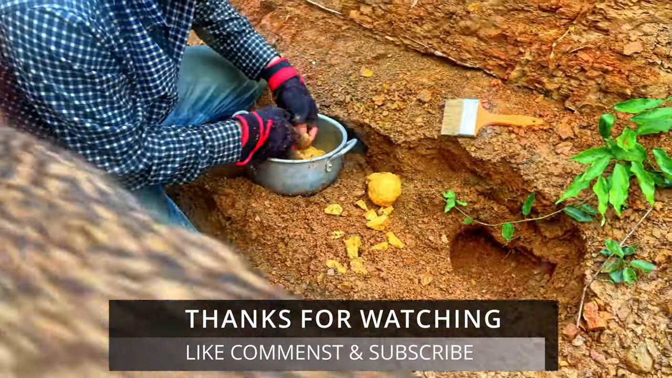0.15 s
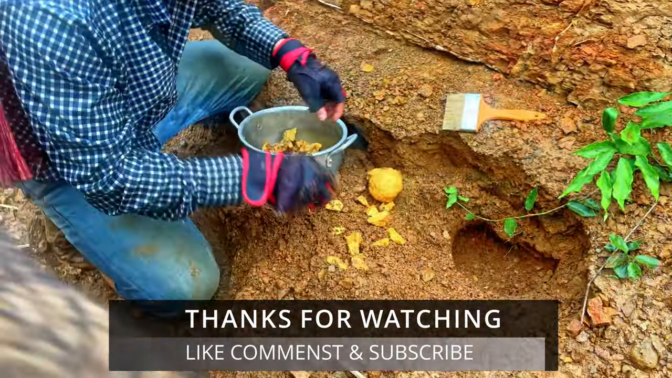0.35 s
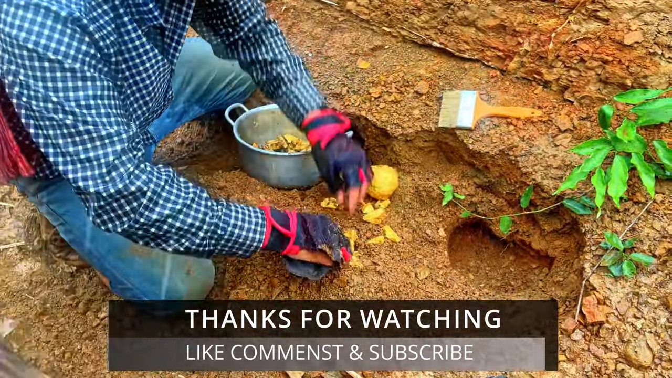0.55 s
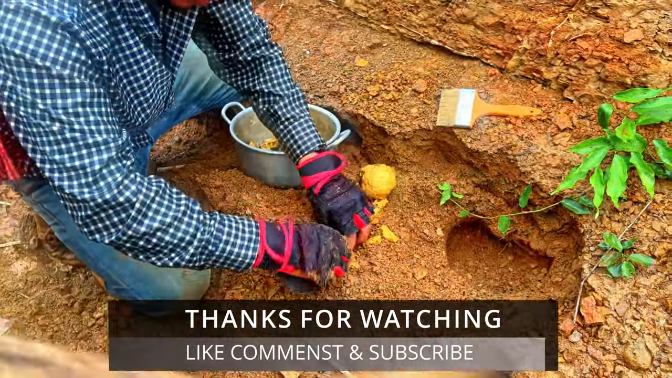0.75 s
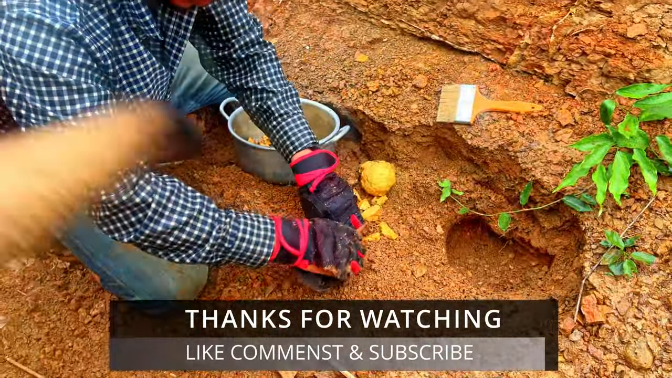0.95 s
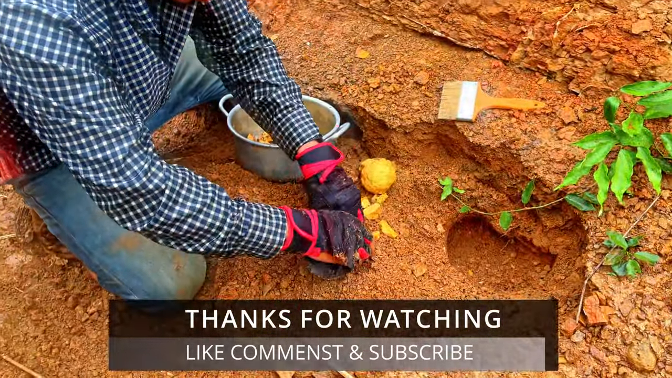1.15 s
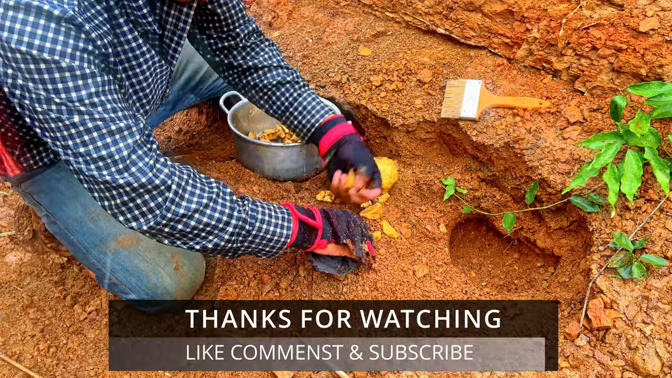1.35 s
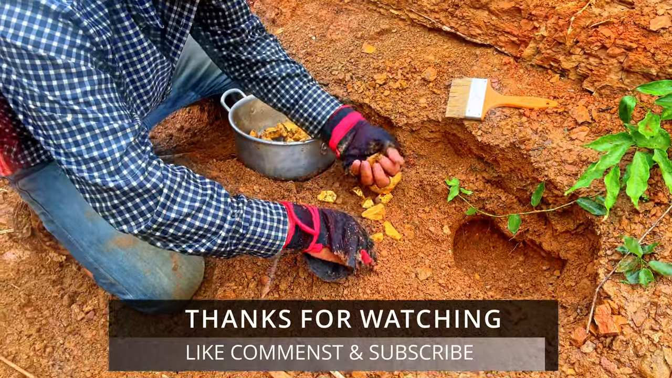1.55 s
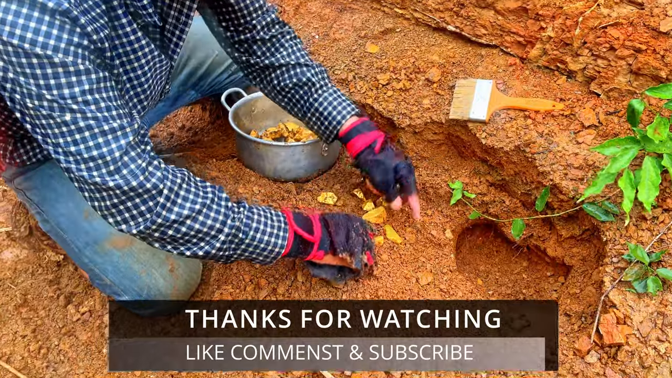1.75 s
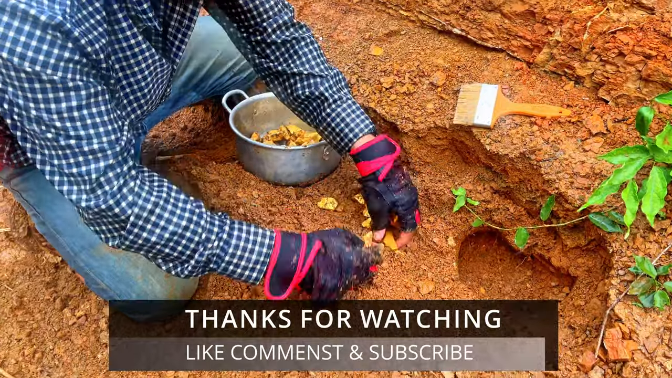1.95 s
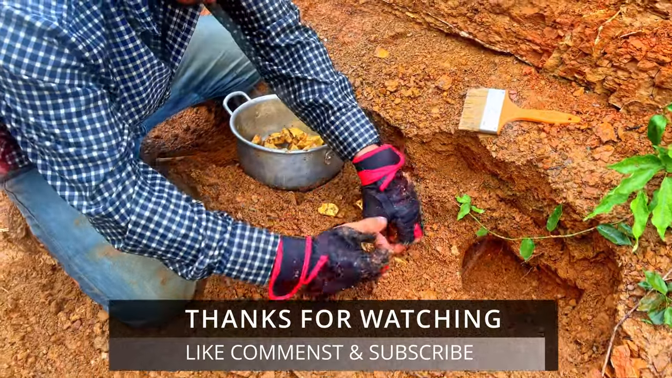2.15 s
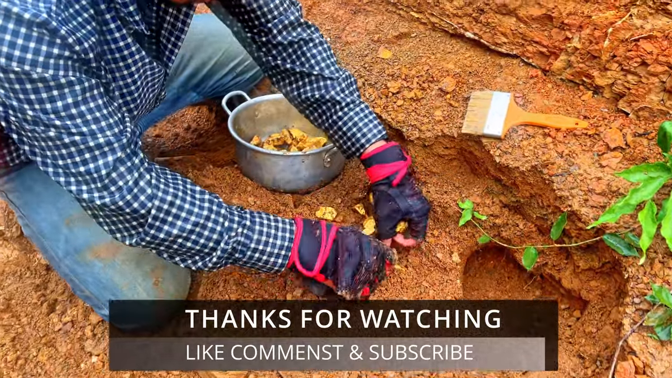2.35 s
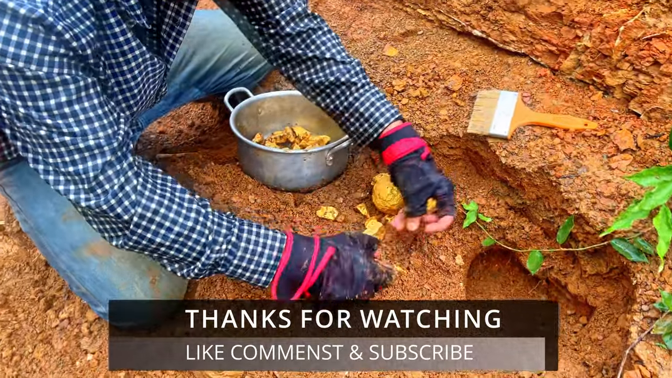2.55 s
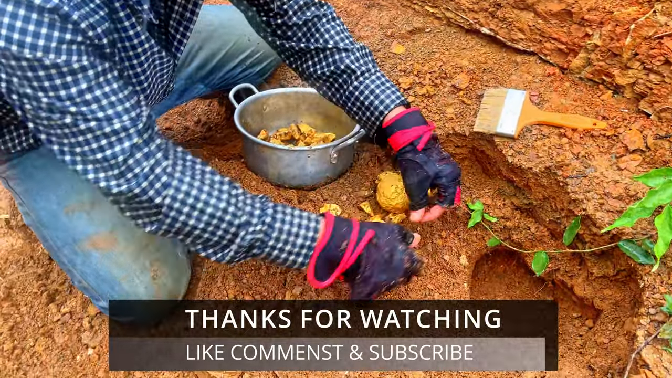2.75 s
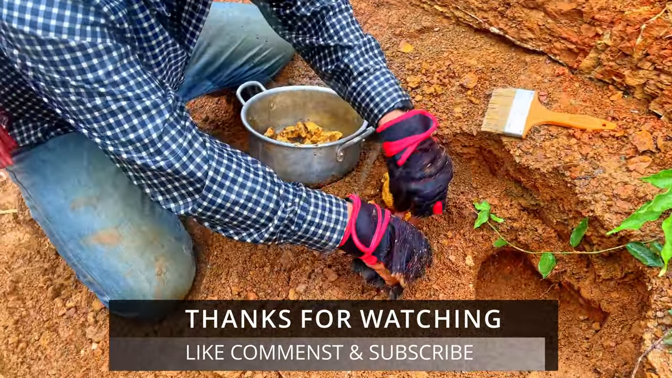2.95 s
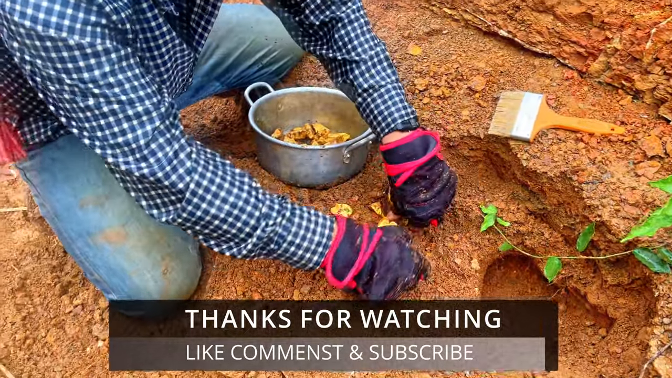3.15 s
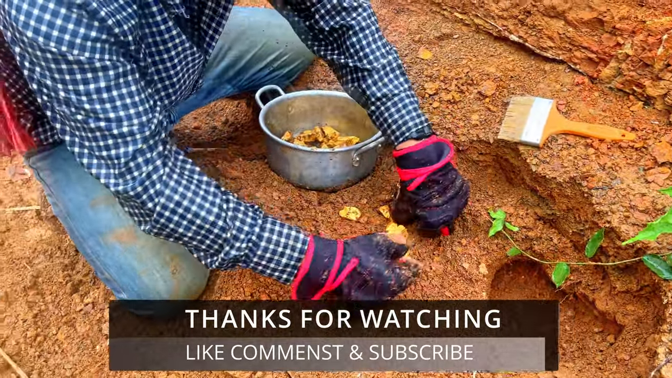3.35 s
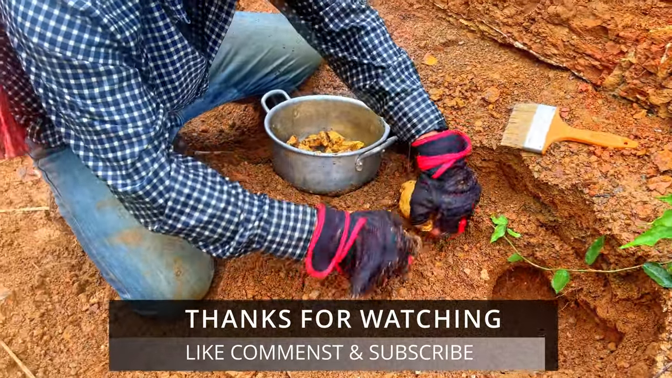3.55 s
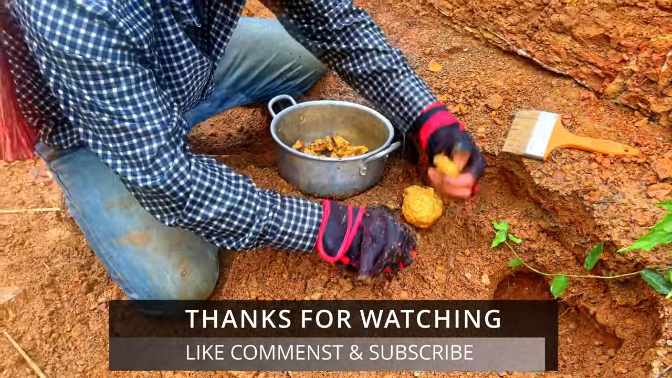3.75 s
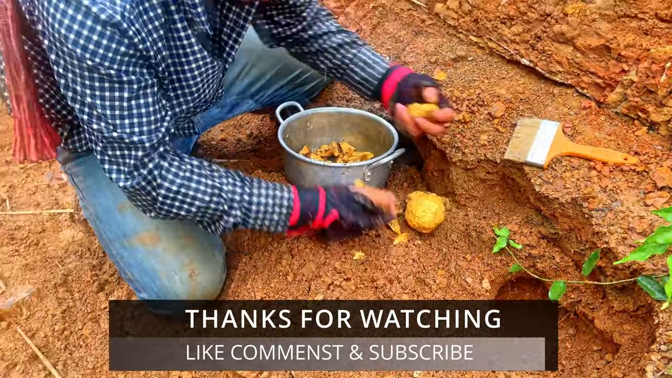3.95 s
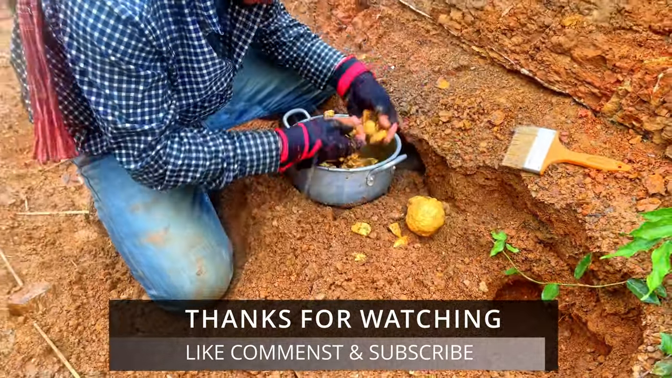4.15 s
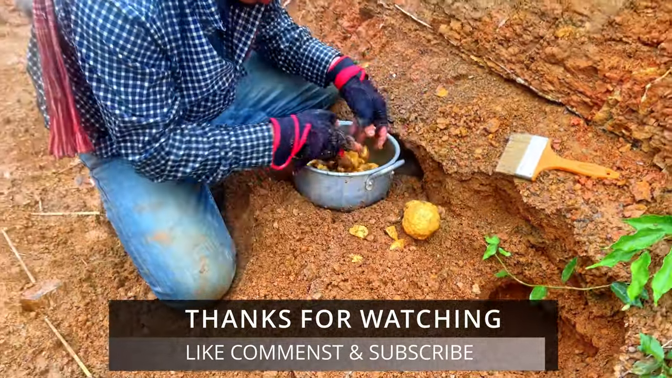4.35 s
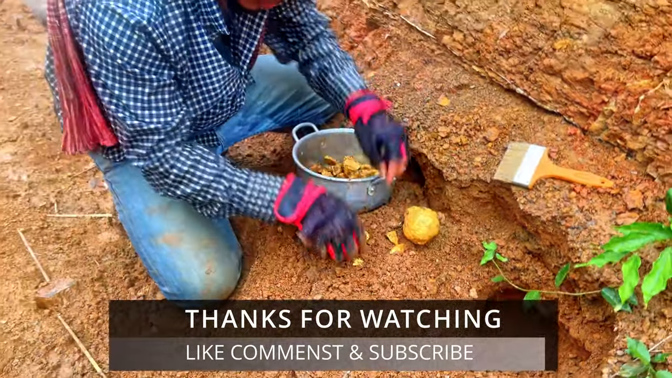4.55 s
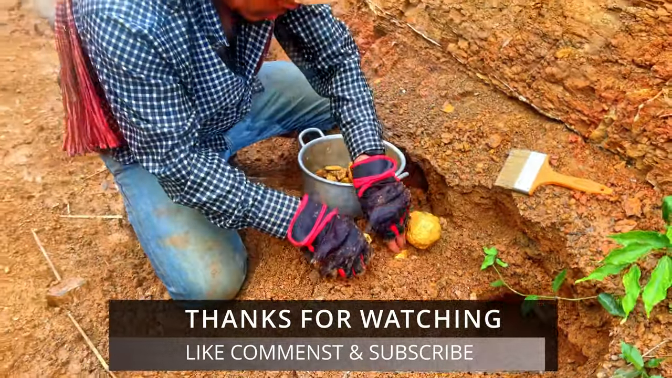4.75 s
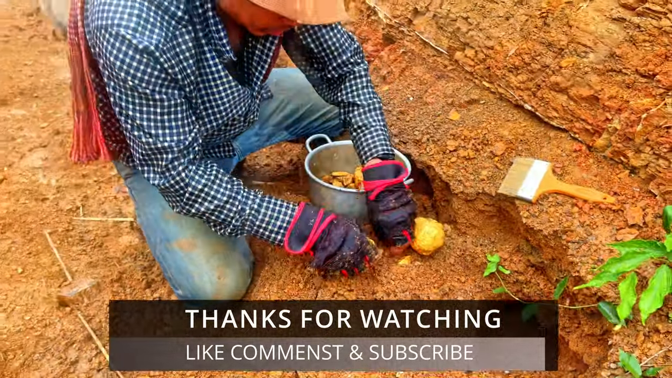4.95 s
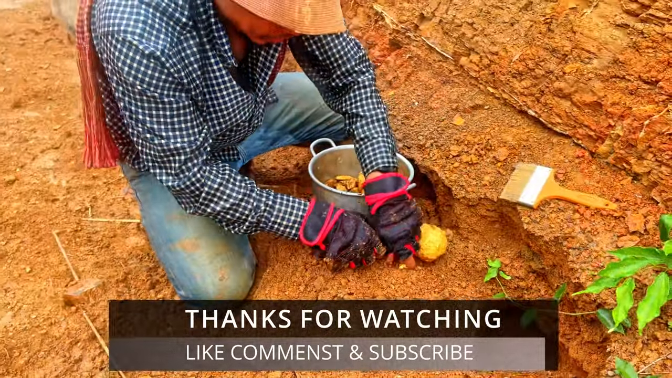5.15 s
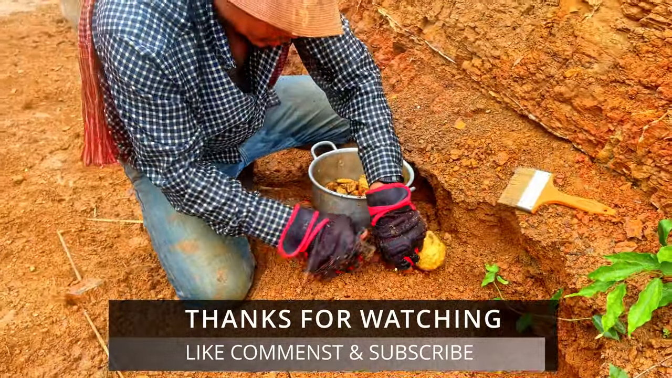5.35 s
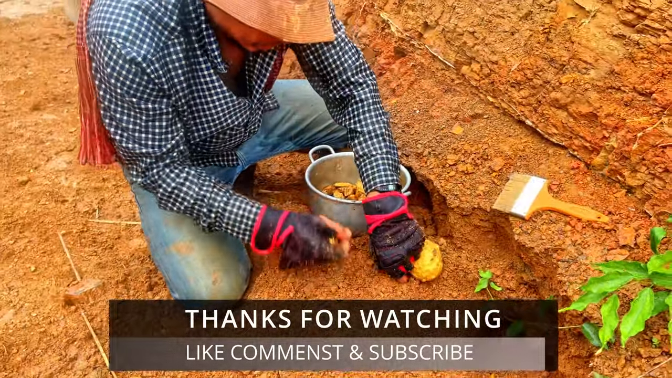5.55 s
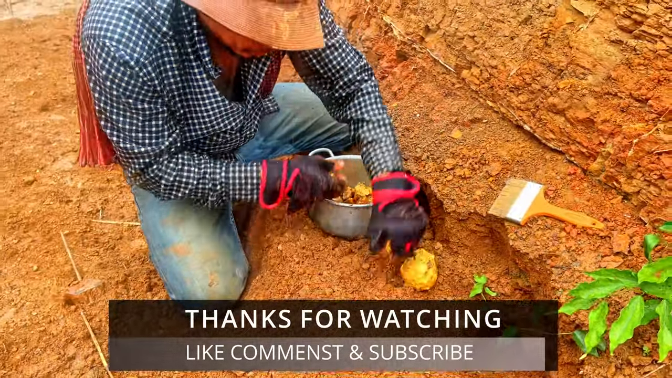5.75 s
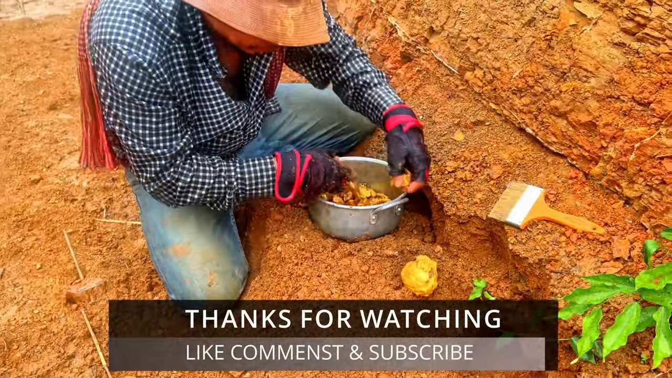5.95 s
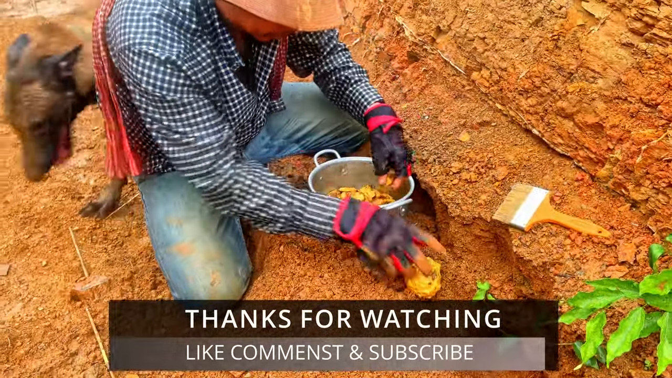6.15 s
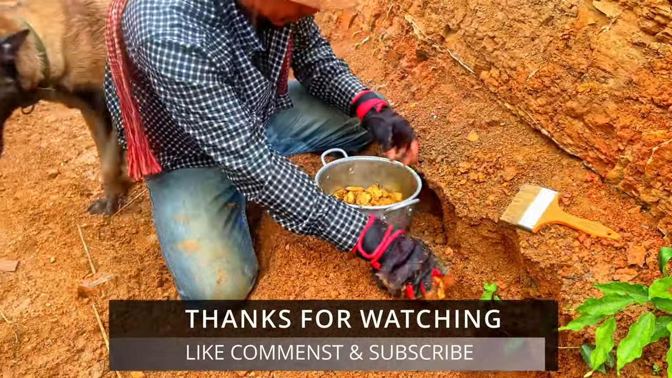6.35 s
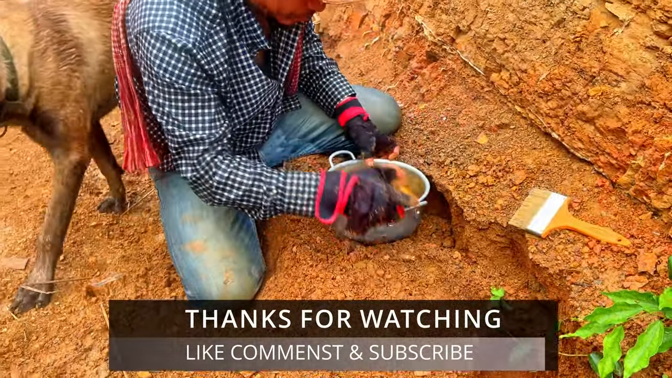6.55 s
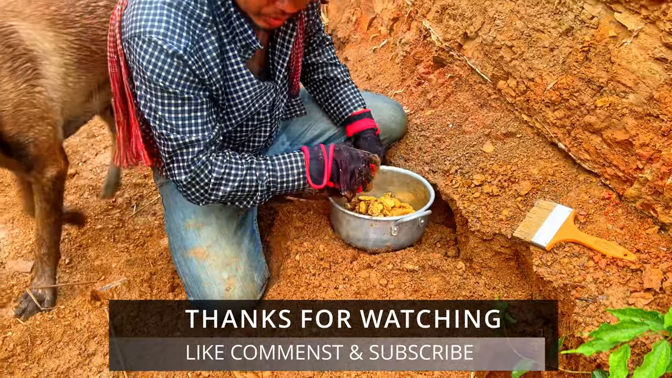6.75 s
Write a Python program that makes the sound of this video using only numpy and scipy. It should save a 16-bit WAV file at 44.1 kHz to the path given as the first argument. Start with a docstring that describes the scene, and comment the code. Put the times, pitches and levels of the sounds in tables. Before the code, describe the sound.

Dry grit crackles and crunches under fingers, with small knocks and brief tinny clatters as lumps land in a metal pot outdoors.

```python
"""Soil lumps into a metal pot

Gloved hands gather lumps from loose dry soil and drop them into a thin metal pot, a metre from a phone.
Grit crackles under the fingers, lumps knock together and crack, the pot rings briefly, a palm scrapes.
A bright, steady open-country hiss lies over a low rustle whose bass comes and goes,
and the mids go hollow in places."""
import sys
import numpy as np
from scipy import signal
from scipy.fft import rfft, irfft
from scipy.io import wavfile
from scipy.ndimage import uniform_filter1d

SR = 44100
rng = np.random.default_rng(int(sys.argv[2]) if len(sys.argv) > 2 else 0)


def to_wav(sig):
    """Store sig (one row per channel, or 1-D mono) as 16-bit WAV at the path in sys.argv[1].

    Samples outside -1..1 are clipped; the rate is SR.
    """
    pcm = np.clip(np.atleast_2d(sig), -1, 1) * 32767
    pcm = np.round(pcm).astype(np.int16)
    wavfile.write(sys.argv[1], SR, pcm.T)  # frames by channels


N = 299880
FRAME, OVERLAP = 2048, 1536  # samples


def undb(db):
    return 10 ** (np.asarray(db) / 20)


def along(table, hz):
    """Read a (Hz, value) table on a log-frequency axis."""
    f, v = np.transpose(table)
    return np.interp(np.log(hz + 1), np.log(f + 1), v)


def curve(table, s):
    """Read the columns of a (seconds, value, ..) table at the times s."""
    t, *columns = np.transpose(table)
    return np.array([np.interp(s, t, c) for c in columns])


def eq(x, table):
    """Pass x through a (Hz, dB) curve."""
    gain = undb(along(table, np.fft.rfftfreq(N, 1 / SR)))
    return irfft(rfft(x.astype(np.float32)) * gain, N)


def add(out, s, x):
    """Mix a short sound in at s seconds."""
    i = max(int(s * SR), 0)
    out[..., i:i + x.shape[-1]] += x[..., :N - i]


def frames_of(x):
    """Short-time spectra: Hz, seconds, frames."""
    return signal.stft(x, SR, nperseg=FRAME, noverlap=OVERLAP)


def snap(decay_ms, width=1.0):
    """A brittle break: a ragged stereo noise burst that dies almost at once."""
    ms = np.arange(SR // 30) * 1000 / SR
    noise = rng.standard_normal(len(ms)) + width * rng.standard_normal((2, len(ms)))
    ragged = np.repeat(undb(3.5 * rng.standard_normal(len(ms))), SR // 1500)[:len(ms)]
    fade = (1 - np.exp(-ms / 0.61)) * np.exp(-ms / decay_ms)
    burst = noise * ragged * fade
    return 1.89 * burst * np.sqrt(2 * np.sum(fade ** 2) / np.sum(burst ** 2))


# Tone of the open air. Each row: frequency in Hz, relative level in dB.
HISS_EQ = [(710, -44.5), (1200, -6.5), (1750, -5), (2150, -2), (2910, -4.5), (4440, -5.5), (6920, -10.5),
           (8870, 1.5), (10200, 5), (11100, 2.5), (11900, -6.5), (12900, -7), (13800, -49), (14700, -16),
           (15900, -26)]
# Rustle automation. Each row: time in seconds, bass edge in Hz, low gain in dB, mid gain in dB.
RUSTLE_MOVES = [(0, 50, -27, -27.5), (.35, 55.5, -20.5, -16), (.6, 49.7, -26, -25.5), (1.4, 70, -27, -36.5),
                (1.57, 129, -29, -47), (1.65, 118, -17, -40), (1.85, 202, -21, -39), (2.3, 154, -35.5, -44),
                (2.52, 79.5, -28, -34.5), (2.58, 90, -25.5, -42), (2.75, 110, -28.5, -50),
                (2.9, 199, -25.5, -41), (3.25, 205, -28.5, -40.5), (3.33, 149, -24, -28.5),
                (3.5, 190, -25.5, -34), (4.0, 148, -32.5, -38.5), (4.3, 109, -25, -45),
                (4.4, 300, -59, -30), (5.5, 269, -48, -47.5), (6.03, 225, -32.5, -59),
                (6.12, 104, -34, -59), (6.22, 174, -33, -38.5), (6.62, 183, -37, -59),
                (6.72, 278, -46, -49)]
# The rustle's low, scoop and mid EQ points in Hz.
RUSTLE_POINTS_HZ = [407, 460, 950]
# How centred the bed sits. Each row: frequency in Hz, left-right correlation from 0 to 1.
BED_CORRELATION = [(100, 0.3), (400, 0.65), (1000, 0.07), (2000, 0.28), (4000, 0.5), (8000, 0.98),
                   (12000, 0.98)]


def rustle_and_hiss(hiss_db=-40, split_hz=1400, rustle_flicker_db=5.0, hiss_flicker_db=4.0, swell_db=1.0):
    """The noise bed, as short-time spectra: soil and sleeves rustle below, open air hisses on top."""
    hz, s, (left, independent) = frames_of(rng.standard_normal((2, N)))
    hiss = along(HISS_EQ, hz)
    hiss += hiss_db - 10 * np.log10(np.mean(undb(2 * hiss)))
    db = np.empty(left.shape)
    for k, (edge, low, mid) in enumerate(curve(RUSTLE_MOVES, s).T):
        bass = [(edge / 2, low - 43), (edge, low - 20), (min(1.54 * edge, 330), low - 3)]
        scoop = (low + mid) / 2 - 4
        body = zip(RUSTLE_POINTS_HZ, (low, scoop, mid))
        db[:, k] = along([*bass, *body, (split_hz, np.interp(split_hz, hz, hiss))], hz)
    below = hz[:, None] < split_hz
    db = np.where(below, db, hiss[:, None])
    flicker = uniform_filter1d(rng.standard_normal(db.shape), size=6, axis=0)
    flicker = uniform_filter1d(flicker, size=3, axis=1)
    flicker = np.minimum(flicker / flicker.std(), 1)  # dips freely, never bulges into a thump
    swell = uniform_filter1d(rng.standard_normal(len(s)), size=3)
    db += np.where(below, rustle_flicker_db, hiss_flicker_db) * flicker + swell_db * swell / swell.std()
    alike = np.clip(along(BED_CORRELATION, hz), 0, 1)[:, None]
    right = alike * left + np.sqrt(1 - alike ** 2) * independent
    return undb(db) * np.array([left, right])


# The bright crack of dry soil. Each row: frequency in Hz, gain in dB.
CRACK_EQ = [(400, -43.5), (1000, -12.5), (2200, 3), (3400, -0.5), (4450, 0.5), (5500, -3), (8600, 6.5),
            (10250, 4.5), (11500, 0.5), (13600, -17.5), (15500, -22)]
# Its duller crunch. Each row: frequency in Hz, gain in dB.
CRUNCH_EQ = [(200, -41.5), (600, 1), (1500, 1.5), (2500, -9), (4000, -15), (7000, -46.5)]
# Pitches in Hz that crumbs of six sizes break around.
CRUMB_PITCHES = [1300, 1900, 2920, 5050, 5700, 9560]
# Fingers working the grit. Each row: time in seconds, fine level in dB, coarse level in dB.
GRIT_LEVELS = [(0, -99, -45.5), (1.4, -43.5, -48), (2.4, -46, -98), (2.6, -41.5, -51), (4.5, -42.5, -48.5),
               (6.8, -44, -51.5)]


def grit(per_s=130, spread_db=3.5, cap_db=10, decay_ms=2.2):
    """Tiny crumbs break, mostly faintly: fine ones tick at a pitch set by size, coarse ones crunch."""
    def stream(colour):
        hits = rng.random(N) < per_s / SR
        strength = undb(np.minimum(spread_db * rng.exponential(size=N), cap_db))
        impulses = hits * strength * rng.choice([-1, 1], N)
        ticks = signal.oaconvolve(impulses[None], snap(decay_ms), axes=1)[:, :N]
        return eq(ticks, colour)
    fine_db, coarse_db = curve(GRIT_LEVELS, np.arange(N) / SR)
    fine = sum(stream([(hz / 4, -60), (hz / 2, -15), (hz, 0), (2 * hz, -15), (4 * hz, -60)])
               for hz in CRUMB_PITCHES)
    fine = eq(fine, CRACK_EQ)
    coarse = stream(CRUNCH_EQ) + stream(CRUNCH_EQ)
    return undb(fine_db) * fine / fine.std() + undb(coarse_db) * coarse / coarse.std()


# Lumps meeting in the hands. Each row: start in seconds, pre-EQ level in dB, pitch in Hz, decay in ms.
LUMP_KNOCKS = [(0.183, -20, 690, 4.2), (0.484, -29, 1060, 4), (0.569, -29, 955, 2.8),
               (0.798, -27, 605, 0.99), (0.832, -18, 733, 0.94), (1.208, -31.5, 1300, 2.3),
               (1.587, -34, 1380, 4.2), (1.6, -30, 1370, 2.5), (1.621, -31.5, 1340, 3),
               (1.715, -34, 1175, 5), (2.439, -37, 390, 4), (2.518, -35, 340, 8), (2.524, -35, 636, 3.8),
               (2.719, -38, 700, 2.2), (2.777, -35, 330, 3.6), (1.906, -22, 804, 8),
               (1.957, -18.5, 780, 5.7), (2.04, -28.5, 840, 6.4), (2.117, -23.5, 810, 6.3),
               (2.151, -33, 800, 5.1), (2.304, -36.5, 790, 5.2), (2.815, -34.5, 686, 3.7),
               (2.842, -35, 890, 2.7), (2.877, -38.5, 670, 3.5), (3.044, -14, 694, 8.3),
               (3.047, -23, 510, 9.5), (3.296, -23.5, 266, 4.4), (3.386, -13, 937, 0.81),
               (3.388, -22, 392, 2.6), (3.62, -24.5, 1005, 1.4), (3.873, -33, 920, 1.8),
               (4.063, -9.5, 759, 2.46), (4.124, -21.5, 1013, 5.8), (4.126, -19, 1410, 1.7),
               (4.175, -30, 900, 7.4), (4.297, -13, 970, 3.5), (4.3, -19, 79, 12),
               (4.2995, -5.5, 297.4, 8.1), (4.472, -27, 1850, 1.7), (4.563, -24, 1600, 1.2),
               (4.584, -24.5, 918, 7), (4.857, -26, 2070, 2.3), (4.871, -35, 906, 6.5),
               (4.959, -29.5, 1050, 1.7), (5.084, -31, 1160, 1.8), (5.377, -19, 2150, 0.41),
               (5.872, -15, 4560, 0.71), (5.931, -10, 4420, 0.4), (6.132, -35.5, 410, 4.6),
               (6.458, -36, 4400, 5.7), (6.532, -38, 4150, 6)]


def knocks(rise_share=0.66, rough=0.15, sag_scale=14.45, settle_db=-22.0, settle_ms=17.0):
    """Each knock swells and fades on one hollow pitch between the palms, then settles in a faint rattle."""
    out = np.zeros((2, N))
    preroll = 0.01
    t = np.arange(SR // 15) / SR - preroll
    for s, db, hz, ms in LUMP_KNOCKS:
        past_peak = (t * 1000 - rise_share * ms) / ms
        swell = np.exp(-np.where(past_peak < 0, past_peak / rise_share, past_peak) ** 2)
        rattle = uniform_filter1d(rng.standard_normal(len(t)), size=SR // 300)
        tail = undb(settle_db) * (past_peak > 0) * np.exp(-past_peak * ms / settle_ms)
        envelope = swell + tail * rattle / rattle.std()
        # a short, hard knock drops in pitch as the contact widens
        widening = np.minimum(t, 2 * ms / 1000)
        lag = sag_scale / ms ** 2 * widening * (2 * t - widening)
        # loose crumbs make the pitch stumble from cycle to cycle
        period = int(SR / hz)
        stumble = rough * np.sqrt(period) * uniform_filter1d(rng.standard_normal(len(t)), size=period)
        phase = 2 * np.pi * (hz * (t - lag) + rng.random()) + stumble
        add(out, s - preroll, undb(db) * envelope * np.sin(phase))
    return eq(out, [(40, -40.5), (200, -1.5)])


# The ring of the thin pot. Each row: mode frequency in Hz, relative level in dB, T60 in seconds.
POT_MODES = [(569, -1, 0.029), (720, -3, 0.032), (1117, -14.5, 0.034), (1083, -8.5, 0.064),
             (1555, -11, 0.068), (2180, -17.5, 0.046), (2400, -12, 0.026), (3090, -7, 0.014),
             (4524, -6.5, 0.013), (6340, -14, 0.022), (7250, -10.5, 0.015)]
# Lumps landing in the pot. Each row: start in seconds, pre-EQ blow level in dB,
# centre of the blow's tone in Hz, pre-EQ crack level in dB.
POT_DROPS = [(0.271, -3.5, 780, -32), (0.276, -10, 740, -51), (0.288, -14.5, 620, -27.5),
             (0.314, -21, 1030, -42), (0.341, -19, 1045, -40), (0.3479, -2.5, 1010, -30),
             (0.364, -10.5, 920, -40), (0.391, -14.5, 670, -23.5), (0.397, -11.5, 960, -20),
             (0.403, -15, 950, -34.5), (0.412, -12.5, 960, -45), (0.418, -31, 990, -44),
             (0.432, -17.5, 700, -48), (0.439, -25, 700, -47), (0.447, -21, 890, -24.5),
             (4.363, -10.5, 1790, -19.5), (4.374, -33, 1920, -26.5), (4.49, -16, 5400, -22),
             (4.494, -21, 2270, -32)]


def pot(reach_octaves=0.6, contact_ms=1.1, tumble_ms=3.6, crack_ms=4.0, crunch_ms=12.8, pan_right_db=1.5):
    """Each lump cracks, tumbles against the wall and rings the modes nearest the tone of its blow."""
    ring, bright, dull = np.zeros((3, 2, N))
    t = np.arange(SR // 6) / SR
    hz, mode_db, t60 = (c[:, None] for c in np.transpose(POT_MODES))
    envelope = 1000. ** (-t / t60) * (1 - np.exp(-1000 * t / contact_ms))
    for s, db, centre_hz, crack_db in POT_DROPS:
        scatter = rng.standard_normal((len(POT_MODES), 2))
        # capped, so the sharp edge of the blow still reaches the high modes
        distance = np.minimum(np.log2(hz / centre_hz) / reach_octaves, 1.5)
        drive_db = -6 * distance ** 2 + 2 * scatter[:, :1]
        detuned_hz = hz * (1 + 0.016 * scatter[:, 1:])
        modes = undb(mode_db + drive_db) * envelope * np.sin(2 * np.pi * detuned_hz * t)
        tumble = 0.062 * snap(tumble_ms, width=0.5)
        tumble[:, 0] = 1  # the first contact is the hardest
        blow = signal.fftconvolve(modes.sum(axis=0)[None], tumble, axes=1)
        add(ring, s, undb(db) * blow / np.abs(blow).max())
        add(bright, s, undb(crack_db) * snap(crack_ms))
        add(dull, s, undb(db - 11) * snap(crunch_ms))
    pan = undb([[-pan_right_db / 2], [pan_right_db / 2]])
    return pan * eq(ring, [(120, 1.5), (430, 0.5)]) + eq(bright, CRACK_EQ) + eq(dull, CRUNCH_EQ)


# Crumbs giving way. Each row: start in seconds, crack level in dB, crunch level in dB, both pre-EQ.
CRUMB_BREAKS = [(0.662, -26.5, -30), (0.72, -30, -22), (1.091, -27, -32), (1.17, -28, -33),
                (1.298, -30, -29), (1.416, -29, -24), (1.445, -39, -21), (1.573, -25.5, -33),
                (1.599, -22, -23), (1.6615, -26, -37), (1.713, -23, -27.5), (1.76, -22.5, -31),
                (1.884, -29, -40), (1.906, -17.5, -28.5), (2.1185, -23.5, -27), (2.526, -36, -27.5),
                (2.611, -34.5, -27.5), (2.691, -26, -32), (2.816, -28.5, -26), (3.0226, -32, -25),
                (3.044, -26, -21), (3.1222, -48, -24.5), (3.252, -21, -25), (3.3847, -26.5, -17.5),
                (3.466, -27.5, -41), (3.508, -25, -40), (3.619, -39, -21.5), (3.712, -30, -32),
                (3.805, -22.5, -22.5), (3.872, -28, -24.5), (4.123, -25, -23), (4.177, -25.5, -37),
                (4.286, -35, -22), (4.295, -29, -10), (4.2995, -29.5, -2.5), (4.308, -40, -18),
                (4.322, -40.5, -19.5), (4.334, -35, -26), (4.342, -33, -21), (4.401, -32, -26),
                (4.5858, -30, -15.5), (4.5998, -41, -22), (4.808, -33.5, -24.5), (4.8576, -25.5, -20.5),
                (4.8945, -30.5, -22.5), (4.959, -26.5, -30), (5.025, -28, -26), (5.0835, -25.5, -26),
                (5.134, -30, -29.5), (5.3024, -24.5, -31), (5.5437, -22.5, -31), (5.692, -29, -26.5),
                (5.8689, -18, -29.5), (5.929, -11.5, -39), (6.1338, -27, -22.5), (6.2594, -27, -41),
                (6.455, -22, -44), (6.459, -13.5, -31), (6.4858, -31, -29), (6.4985, -22.5, -29.5),
                (6.62, -24, -37)]


def cracks(crack_ms=1.66, crunch_ms=4.46):
    """A crumb breaks between the fingers with a bright crack and a duller, longer crunch."""
    bright, dull = np.zeros((2, 2, N))
    for s, crack_db, crunch_db in CRUMB_BREAKS:
        sharp = snap(crack_ms)
        muted = 2 * uniform_filter1d(sharp, size=5)
        softness = rng.random() ** 2  # softer crumbs lose some treble
        add(bright, s, undb(crack_db) * ((1 - softness) * sharp + softness * muted))
        add(dull, s, undb(crunch_db) * snap(crunch_ms))
    return eq(bright, CRACK_EQ) + eq(dull, CRUNCH_EQ)


# A palm dragged through the soil. Each row: time in seconds, pitch in Hz, pre-EQ level in dB.
PALM_DRAG = [(1.6, 215, -60), (1.635, 214, -37.5), (1.67, 232, -33), (1.72, 296.6, -53), (1.785, 360, -40),
             (1.86, 417, -55), (1.9, 440, -71)]


def scrape(waver=0.1794, throb_db=3.5, grain_ms=14.38):
    """The palm sticks and slips: a dull, rising hum whose pitch and level stumble every few cycles."""
    t = np.arange(N) / SR
    hz, db = curve(PALM_DRAG, t)
    slip = uniform_filter1d(rng.standard_normal((2, N)), size=int(grain_ms * SR / 1000), axis=1)
    throb, bend = slip / slip.std()
    gate = (t > PALM_DRAG[0][0]) & (t < PALM_DRAG[-1][0])
    phase = 2 * np.pi * np.cumsum(hz * (1 + waver * bend)) / SR
    hum = gate * undb(db + throb_db * throb) * np.sin(phase)
    return eq(hum, [(70, -51), (170, 2.5)])


# Passing notches in the mids. Each row: start and end in seconds, centre in Hz, depth in dB.
MID_NOTCHES = [(1.733, 2.412, 924, 17), (1.907, 2.124, 526, 17), (2.337, 2.486, 860, 24),
               (3.131, 3.27, 498, 61), (4.121, 4.284, 542, 131), (4.335, 6.043, 518, 26.5),
               (4.34, 5.799, 797, 15), (5.863, 6.046, 1176, 70), (5.89, 6.09, 906, 99),
               (6.468, 6.672, 955, 26), (6.633, 6.748, 770, 29)]


def hollows(hz, s, width_hz=87, fade_s=0.0091):
    """Narrow bands dip and the mix goes hollow: a gain per frequency and frame."""
    db = np.zeros((len(hz), len(s)))
    for start, end, centre_hz, depth_db in MID_NOTCHES:
        fade = np.clip(np.minimum(s - start, end - s) / fade_s, 0, 1)
        db -= depth_db * fade * np.exp(-((hz[:, None] - centre_hz) / width_hz) ** 2)
    return undb(db)


# Balance between the microphone ports. Each row: frequency in Hz, left minus right in dB.
MIC_BALANCE = [(500, 1), (1000, 1.5), (2200, 2), (4400, 3), (8000, 0.5)]
# Phase between the ports. Each row: frequency in Hz, left lead in radians.
MIC_PHASE = [(400, 0), (950, -.8), (1550, -1.6), (2500, .8), (6500, .6), (8000, .9), (10800, -4.1),
             (12000, -6.2), (13200, -9.3), (15100, -12.6)]


def mic_ports(x):
    """The phone's two ports hear each frequency at a different level and phase."""
    hz = np.fft.rfftfreq(N, 1 / SR)
    left = undb(along(MIC_BALANCE, hz) / 2) * np.exp(.5j * along(MIC_PHASE, hz))
    return irfft(rfft(x) * np.array([left, 1 / left]), N)


def scene():
    """Handwork over the noise bed, notched together and heard at the two ports."""
    hz, s, hands = frames_of(grit() + scrape() + knocks() + cracks() + pot())
    spectra = (rustle_and_hiss() + hands) * hollows(hz, s)
    _, mix = signal.istft(spectra, SR, nperseg=FRAME, noverlap=OVERLAP)
    return mic_ports(mix[:, :N])


def record(dry):
    """The phone cuts the top steeply at 15.9 kHz."""
    return signal.sosfilt(signal.ellip(10, .2, 80, 15900, fs=SR, output="sos"), dry)


dry = scene()
out = record(dry)
to_wav(out)
```